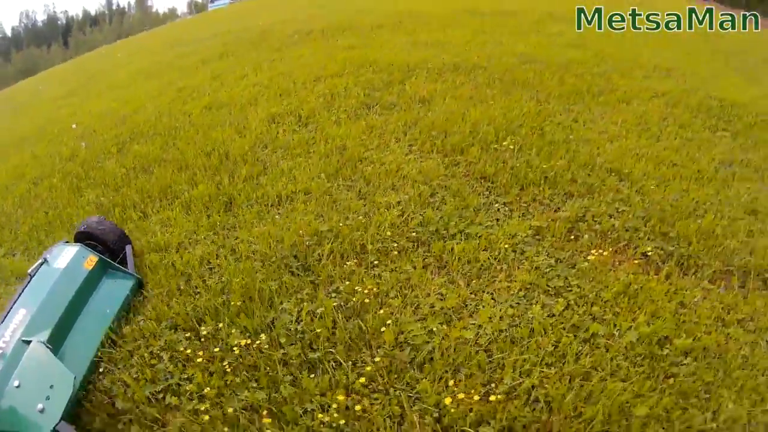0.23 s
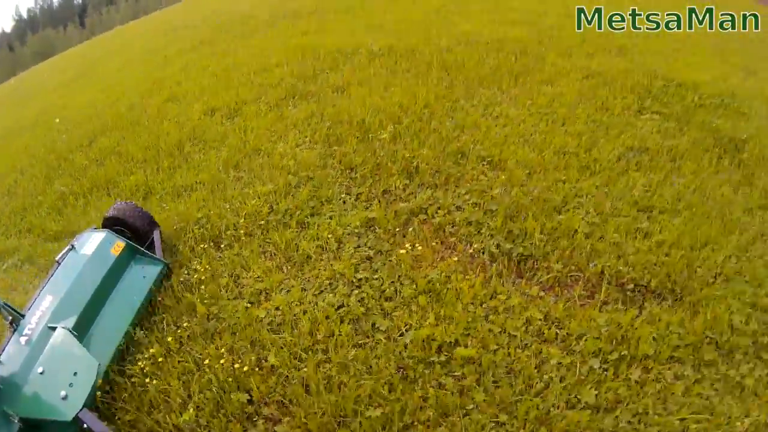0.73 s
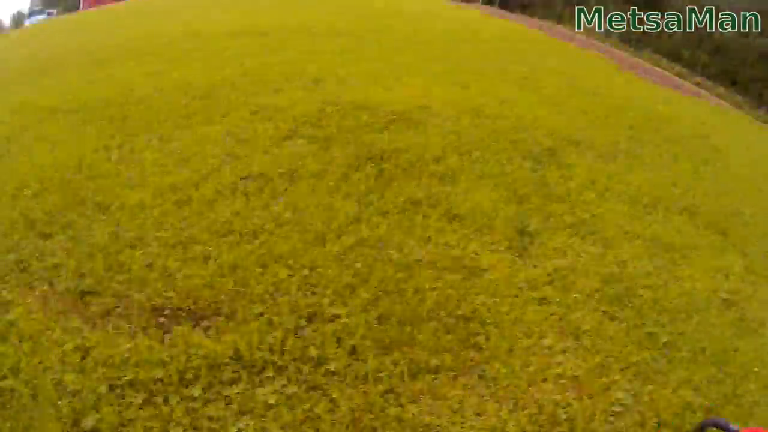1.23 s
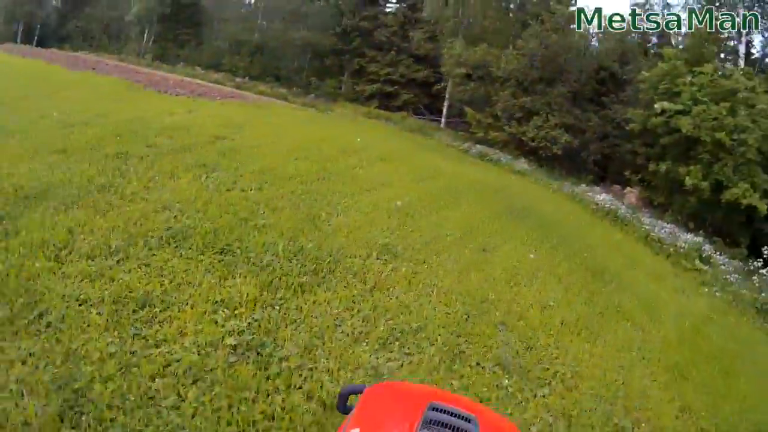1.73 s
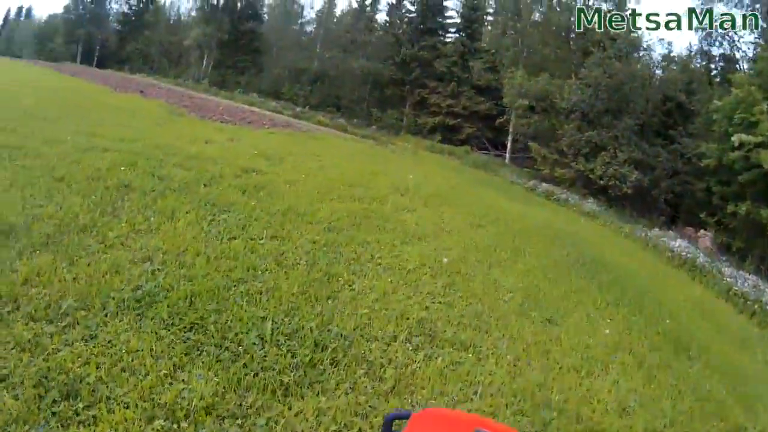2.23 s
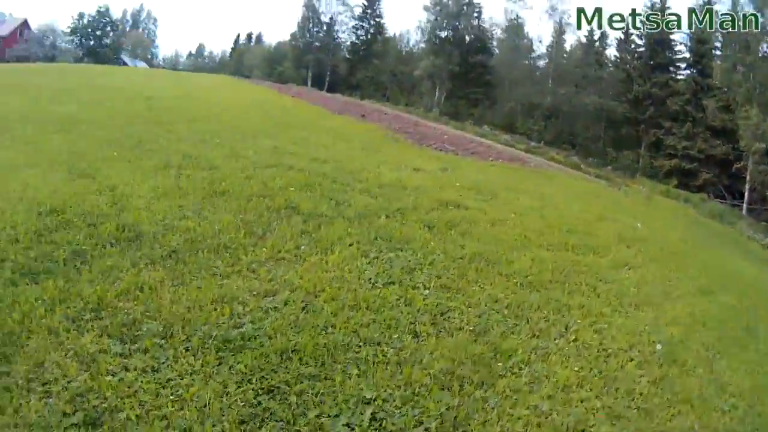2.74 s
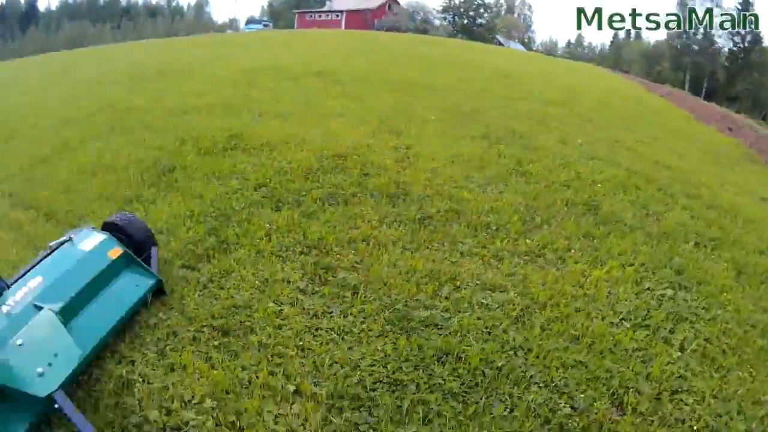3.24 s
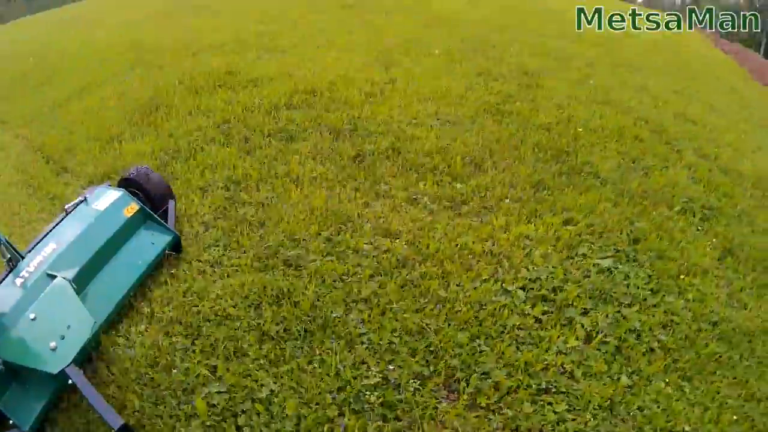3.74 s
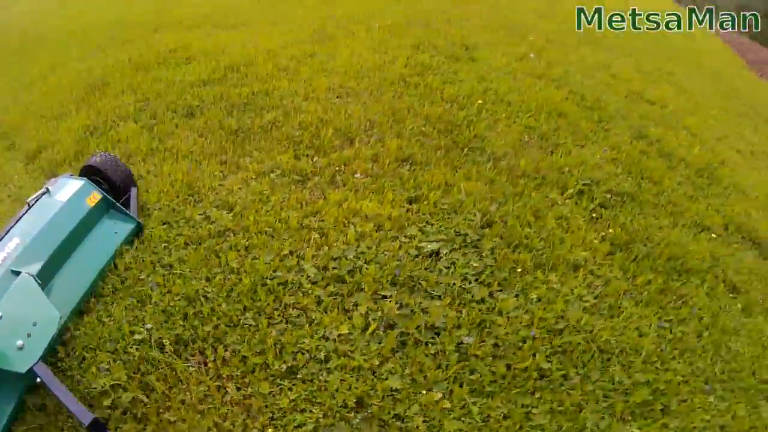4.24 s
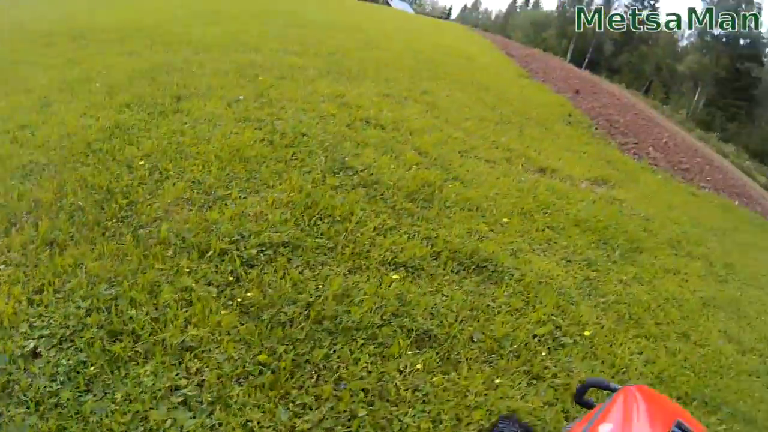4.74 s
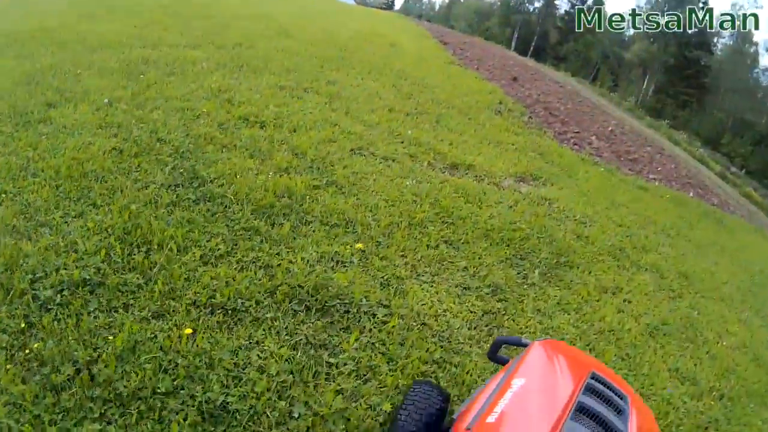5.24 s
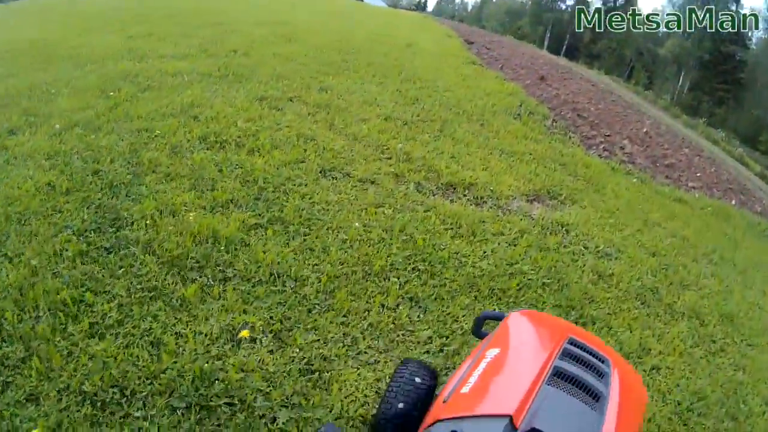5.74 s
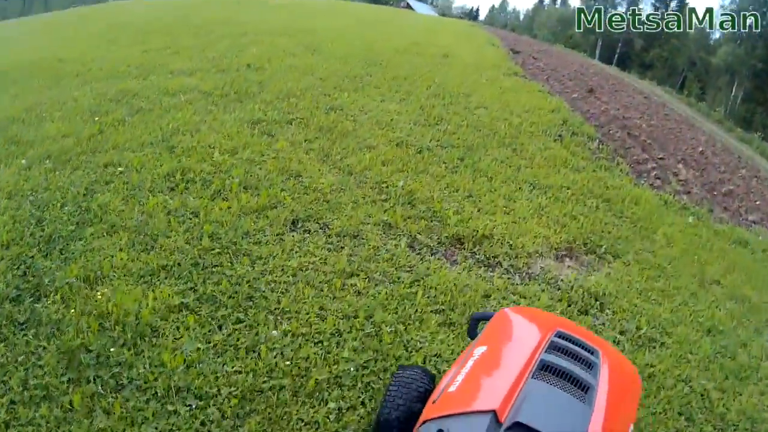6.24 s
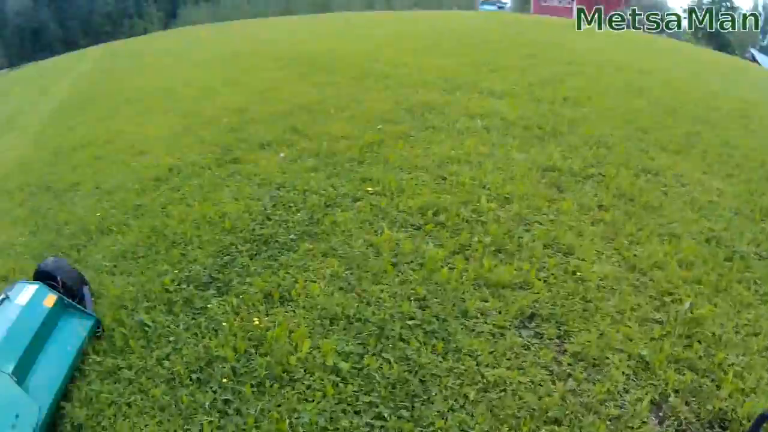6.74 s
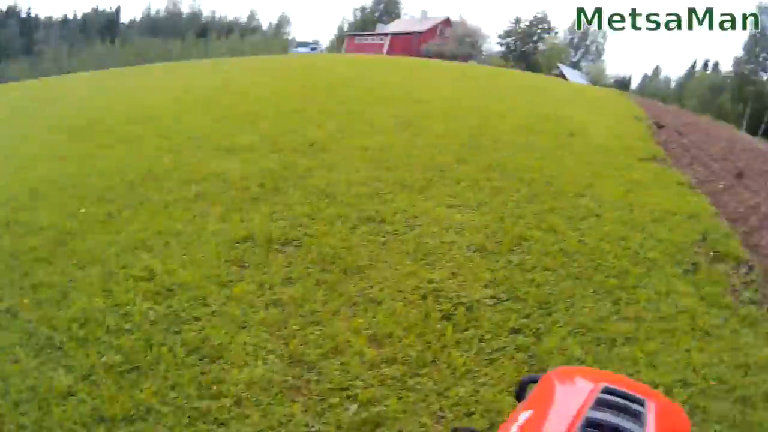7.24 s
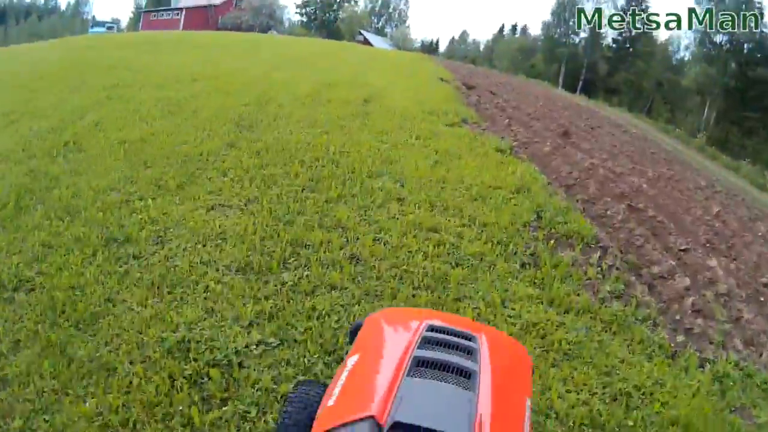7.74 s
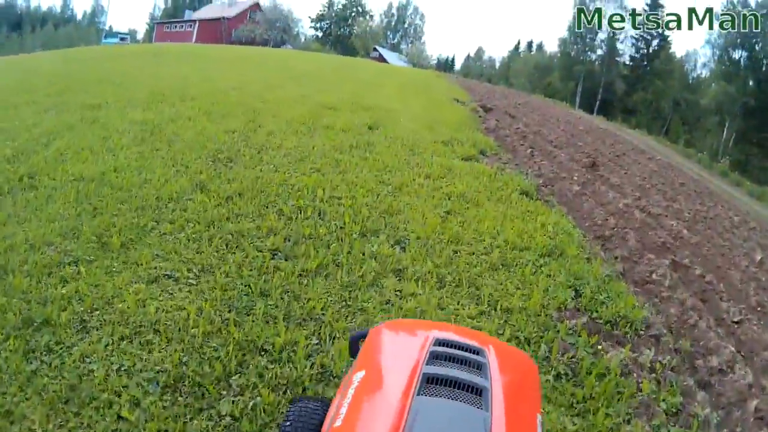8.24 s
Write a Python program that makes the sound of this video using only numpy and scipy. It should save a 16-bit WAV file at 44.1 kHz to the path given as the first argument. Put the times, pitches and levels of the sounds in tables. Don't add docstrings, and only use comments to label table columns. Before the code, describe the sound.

Full, loud mowing noise from start to finish, heard at the driver's head through a camera case in an open field. A lawn tractor's single-cylinder engine chugs about 20 times a second; the towed flail mower's engine buzzes at about 30. Around them is a thick, rough roar of flail wind and shredded grass, pulsing with the firings, plus belt whine and rotor hum. The first 1.3 seconds are brighter; treble then dims until about 3, opens again until 4.5, and partly dulls afterwards. Around 4.7 the mower sags slightly, recovers, and dips again near 6.1. It brightens at 6.7-7.2, then darkens to the end. A deck panel sings softly near 0.3-1.1, 3.4-4.6, 6.5 and 8.2. Small steel ticks cluster at 4.1-4.4, with isolated ones near 5, 5.6 and 6.8. The drone is cut off still running at 8.5.

```python
import sys
import numpy as np
from scipy import signal
from scipy.io import wavfile
from scipy.ndimage import uniform_filter1d, minimum_filter1d, map_coordinates

SR = 44100
rng = np.random.default_rng(int(sys.argv[2]) if len(sys.argv) > 2 else 0)


def waveform_to_disk(signal):
    frames = np.transpose(np.atleast_2d(signal))
    scaled = np.clip(frames, -1, 1) * 32767
    samples = np.round(scaled).astype(np.int16)
    wavfile.write(sys.argv[1], SR, samples)


def gain_from_db(level_db):
    decades = np.asarray(level_db, float) / 20
    return 10 ** decades


N = 373967
STEP = 16

# time_s, crank_rpm
MOWER_SPEED = [(0.0, 3618.3), (1.05, 3616.2), (1.35, 3628.0), (1.65, 3653.6), (2.25, 3651.8),
               (2.75, 3669.3), (3.1, 3666.4), (4.3, 3601.5), (4.75, 3556.7), (5.45, 3612.5), (6.15, 3573.7),
               (6.75, 3627.5), (7.4, 3615.0), (8.48, 3649.5)]
# time_s, facing_mower (0 = ahead, 1 = at the mower)
HEAD = [(0, 1), (1.3, 1), (1.45, 0), (2.9, 0), (3.3, 1), (4.4, 1), (4.75, 0), (6.55, 0), (6.75, 1),
        (7.15, 1), (7.35, 0), (8.48, 0)]


def evened(x):
    return x / np.sqrt(np.mean(x ** 2) + 1e-20)


def columns(rows, t):
    time_s, *values = np.transpose(rows)
    return [np.interp(t, time_s, v) for v in values]


def read(f, value, hz):
    return np.interp(np.log(hz + 1), np.log(np.asarray(f) + 1), value)


def drift(per_s):
    knots = rng.standard_normal(400)
    places = np.arange(0, N, STEP) / SR * per_s
    return map_coordinates(knots, [places], order=3) * 1.1


def following(gains, t):
    # time_s, openness (0-1)
    path = [(0, 0.88), (.4, .75), (.8, 0.79), (1.3, 0.6), (1.55, 0.08), (2.4, .15), (2.75, 0.44),
            (3.7, 0.75), (4.4, 0.9), (4.8, 0.69), (5.5, 0.65), (6.45, .4), (6.65, 0.7), (7.1, 0.85),
            (7.4, 0.26), (7.8, 0.2), (8.48, 0.35)]
    free_rpm, full_sag_rpm = 3665, 100
    load = (free_rpm - columns(MOWER_SPEED, t)[0]) / full_sag_rpm
    causes = np.array([columns(path, t)[0], load, columns(HEAD, t)[0]])
    return np.array(gains) @ (causes - causes.mean(axis=1, keepdims=True))


def firings(rpm):
    return np.cumsum(rpm) / 120 / SR


def orders(cycles, table, change_db, twist, late, smear, waver_db, slip):
    out = 0
    for (k, db), change in zip(table, change_db):
        loose = min(k / 10, 1)
        phase = 2 * np.pi * k * (cycles[::STEP] - late) + twist + smear * k ** 2
        phase = phase + loose * slip * drift(5.0)
        level_db = db + change + loose * waver_db * drift(7.0)
        out = out + gain_from_db(level_db) * np.cos(phase)
    full_rate = signal.resample_poly(out, STEP, 1, window=("kaiser", 12), padtype="line")
    return np.sqrt(2) * full_rate[:N]


def tractor_engine(tractor, whine_lead):
    # multiple of the firing rate, level_db
    tones = [(1, -46), (2, -37), (3, -50.5), (4, -37), (5, -30), (6, -36), (7, -38.5), (8, -33), (9, -43),
             (10, -31), (11, -28), (12, -25), (13, -44), (14, -48), (15, -37), (16, -43), (17, -53),
             (18, -54), (19, -43.5), (20, -36.5), (21, -40.5), (22, -43.5), (23, -47), (24, -51), (25, -45),
             (26, -40.5), (27, -50), (28, -46), (29, -57), (30, -50)]
    # multiple, level_db
    belt_tone = [(1, -27)]
    # time_s, belt_grip_db, silencer_pull_db, exhaust_bark_db
    effort = [(0, -7, -12, 10), (.2, -3, 1.5, -3), (.7, 2.5, 0.5, -10), (1.4, 3, 0, 1),
              (2.4, -0.5, 0, -2.5), (3.0, -4, -4, -4), (3.6, -4, -7, 2), (3.95, -4, 0.5, 4),
              (4.4, -2.5, -2, 7), (5.0, -1, 0, -3), (5.55, 6.5, 2, 7.5), (6.0, 0, 1.5, -10),
              (6.35, 6.5, -1, 1.5), (6.9, -2.5, 1.5, 4), (7.3, -5, 1.5, 3), (7.8, 0, 3, -1.5),
              (8.15, 0, -1, -4), (8.48, -8, -4, -4)]
    t = np.arange(0, N, STEP) / SR
    grip, silencer, bark = columns(effort, t)
    thump = 0.37 * (t - 5.0)
    changes = [0, 0, -4, -0.7 * grip] + [thump] * 3 + [-15]
    changes += [silencer] * 4 + [bark] * 10 + [bark - 3] * 8
    engine = orders(tractor, tones, changes, -4.9, -0.084, 0, 0.9, 0.3)
    whine = orders(8 * tractor + whine_lead, belt_tone, [grip], 0, 0, 0, 4, 1.5)
    return engine + whine


def mower_engine(mower, exhaust_db, upper_db):
    # multiple of the firing rate, level_db
    tones = [(1, -42.5), (2, -33), (3, -51), (4, -34.5), (5, -34.5), (6, -37.5), (7, -37), (8, -35),
             (9, -35.5), (10, -33), (11, -28.5), (12, -42), (13, -31), (14, -35), (15, -40.5), (16, -54.5),
             (17, -42.5), (18, -46), (19, -42), (20, -44), (21, -53), (22, -42.5), (23, -57.5), (24, -37)]
    changes = [0] * 4 + [exhaust_db] * 12 + [upper_db] * 4 + [-4] * 4
    return orders(mower, tones, changes, 4.2, 0.115, 0, 0.9, 0.25)


def rotor_hum(mower, lead, hum_db):
    # multiple of the rotor turns, level_db
    tones = [(1, -46), (2, -36), (4, -23.5), (8, -39), (9, -46)]
    turns = 1.6611 * mower + lead
    return orders(turns, tones, [hum_db] * len(tones), 4.19, 0.25, 0.524, 1.8, 0.3)


def puffs(cycles, width, echo, late, uneven_db):
    def burst(u):
        return np.exp((np.cos(2 * np.pi * u) - 1) / width)

    sizes = gain_from_db(uneven_db * rng.standard_normal(400))
    size = sizes[np.floor(cycles + 0.5).astype(int) % 400]
    return evened(size * burst(cycles) + echo * size * burst(cycles - late) + 0.12)


def roar_colour(t, hz):
    # pitch_hz, level_db (per Hz)
    low_part = [(8, -40), (25, -21), (45, -18), (75, -25), (105, -9), (140, -3.5), (200, -1.5), (300, -2.5),
                (450, -1), (600, -5)]
    # pitch_hz, level_db (per Hz)
    high_part = [(350, -31), (600, -1), (789, -3.5), (1440, -7), (1790, -14), (2320, -21), (2680, -25),
                 (3390, -31), (5420, -37.5), (6760, -47), (7610, -41), (8660, -42), (10000, -51),
                 (12200, -49), (13500, -62.5)]
    pivots = (1000, 3000, 8200, 11800)
    # open_path_db, full_load_db, facing_mower_db
    pivot_gains = [(1.5, 1.5, 0), (5.5, 1.5, -0.5), (13, -1, -1), (6.5, -0.5, -3)]
    # pitch_hz, width_hz, facing_mower_db, facing_ahead_db
    case = [(1455, 93, 2.5, 1), (2697, 270, 6.5, 3), (4930, 440, 0, -5), (5500, 170, -1, 3),
            (6760, 350, -1, -2), (9600, 900, 2.5, -2.5)]
    turn_db = np.array([read(pivots, bands, hz) for bands in following(pivot_gains, t).T])
    low, high = read(*np.transpose(low_part), hz), read(*np.transpose(high_part), hz)
    join_db = low_part[-1][1] - high[14]
    colour_db = np.where(hz < 600, low, high + join_db) + turn_db
    facing = columns(HEAD, t)[0][:, None]
    for f, width, toward, ahead in case:
        peak_db = facing * toward + (1 - facing) * ahead
        colour_db = colour_db + peak_db / (1 + (2 * (hz - f) / width) ** 2)
    return colour_db


def roar(tractor, mower):
    # pitch_hz, steady_wash_db, tractor_rasp_db, mower_rasp_db
    share_table = [(100, 0, -10.5, -21), (400, 0, -8, -11), (1000, -2.5, -10, -11), (3000, -2, -8, -9.5),
                   (6500, -2.5, -8.5, -7.5), (12000, -3, -13.5, -7)]
    # open_path_db, full_load_db, facing_mower_db
    rasp_gains = [(0, 1.7, -3.1), (7, 1, 0.91)]
    # open_path_db, full_load_db, facing_mower_db
    valve_gains = [(0.94, 4, -3)]
    frames = N // 256 + 5
    hz = np.fft.rfftfreq(1024, 1 / SR)
    t = np.arange(frames) * 256 / SR
    colour_db = roar_colour(t, hz)
    tractor_db, mower_db = following(rasp_gains, t)
    valves_db = (2.1 + following(valve_gains, t).T) * (hz > 10200)
    changes_db = 0, tractor_db[:, None], mower_db[:, None] + valves_db
    tractor_gate = puffs(tractor - 0.76, 0.12, 0.78, 0.21, 0.97)
    mower_gate = puffs(mower - 0.89, 0.49, 0.86, 0.14, 0.47)
    f, *shares = np.transpose(share_table)
    out = np.zeros(N)
    for share, gate, change_db in zip(shares, (1, tractor_gate, mower_gate), changes_db):
        a, b, patches = rng.standard_normal((3, frames, 513))
        patches = uniform_filter1d(patches, size=10, axis=0)
        patches = evened(uniform_filter1d(patches, size=12, axis=1))
        db = colour_db + read(f, share, hz) + change_db + 0.74 * patches
        noise = signal.istft(((a + 1j * b) * gain_from_db(db)).T, nperseg=1024, noverlap=768)[1]
        out += gate * noise[:N]
    return gain_from_db(-19) * evened(out)


def panel():
    # start_s, length_s, level_db, pitch_hz
    spells = [
        (.3, .8, -29, 573),
        (3.4, .75, -28, 575),
        (4.2, .4, -31, 570),
        (6.45, .4, -32, 574),
        (8.2, .28, -32, 576),
    ]
    rise_s, waver_hz = 0.085, 1.62
    out = np.zeros(N + SR)
    wander = np.repeat(drift(5.5), STEP)
    for s, length, db, hz in spells:
        start = round(s * SR)
        t = np.arange(0, length, 1 / SR)
        swell = np.minimum(np.minimum(t, length - t) / rise_s, 1)
        turns = np.cumsum(hz + waver_hz * np.resize(wander[start:], len(t))) / SR
        out[start:][:len(t)] += np.sqrt(2) * gain_from_db(db) * swell * np.sin(2 * np.pi * turns)
    return out[:N]


def ticks():
    # start_s, peak_db, pitch_hz
    strikes = [
        (4.0885, -38, 4750),
        (4.1215, -28, 4430),
        (4.1814, -36, 4460),
        (4.2188, -36, 4520),
        (4.4159, -37, 4920),
        (4.9621, -33, 6160),
        (5.5603, -39, 4160),
        (6.8243, -41, 4777),
    ]
    out, t = np.zeros(N + SR), np.arange(1500) / SR
    for s, db, hz in strikes:
        ring = np.sin(2 * np.pi * hz * t) + 0.66 * np.sin(2 * np.pi * 1.045 * hz * t)
        fade = gain_from_db(db - 11.0 - 60 * t / 0.054)
        out[round(s * SR):][:len(t)] += fade * np.minimum(t / 0.0012, 1) * ring
    return out[:N]


def scene():
    # time_s, crank_rpm
    tractor_speed = [(0.0, 2444.2), (0.3, 2469.7), (0.8, 2449.8), (1.35, 2482.7), (1.75, 2467.7),
                     (2.0, 2477.3), (2.65, 2451.1), (3.4, 2486.7), (3.8, 2444.0), (4.8, 2439.5),
                     (5.15, 2404.1), (5.7, 2412.3), (6.15, 2463.1), (7.05, 2451.8), (7.35, 2488.8),
                     (7.75, 2439.1), (8.1, 2485.9), (8.48, 2456.3)]
    # time_s, rotor_lead (turns), whine_lead (cycles)
    creep = [(0, .11, -.24), (1.5, .06, .08), (2.5, .11, .33), (3.8, .25, .76), (4.2, .27, .47),
             (5.5, .14, .4), (6.3, 0, .63), (7, -.03, .85), (7.8, -.065, .7), (8.48, .03, .8)]
    # open_path_db, full_load_db, facing_mower_db
    tone_gains = [(3, 1.5, 1.5), (4, 2.5, 0), (4, 0.5, -8)]
    t = np.arange(N) / SR
    rotor_lead, whine_lead = columns(creep, t)
    tractor = firings(columns(tractor_speed, t)[0])
    mower = firings(columns(MOWER_SPEED, t)[0])
    exhaust_db, hum_db, upper_db = following(tone_gains, t[::STEP])
    out = tractor_engine(tractor, whine_lead)
    out += mower_engine(mower, exhaust_db, upper_db)
    out += rotor_hum(mower, rotor_lead, hum_db)
    return (out + roar(tractor, mower) + panel() + ticks())[None]


def band_limit(x):
    return signal.sosfilt(signal.butter(12, 13640, fs=SR, output="sos"), x)


def record(dry):
    over_db = np.maximum(20 * np.log10(abs(dry) + 1e-9) + 1.6, 0)
    held_db = -minimum_filter1d(-over_db, size=301)
    ease_db = uniform_filter1d(held_db, size=300)
    fade_in = np.minimum(np.arange(N) / 60, 1)
    return band_limit(fade_in * dry / gain_from_db(ease_db))


dry = scene()
out = record(dry)
waveform_to_disk(out)
```